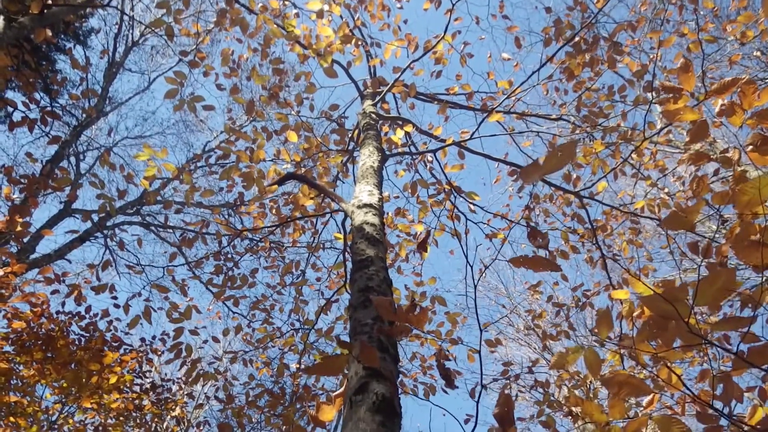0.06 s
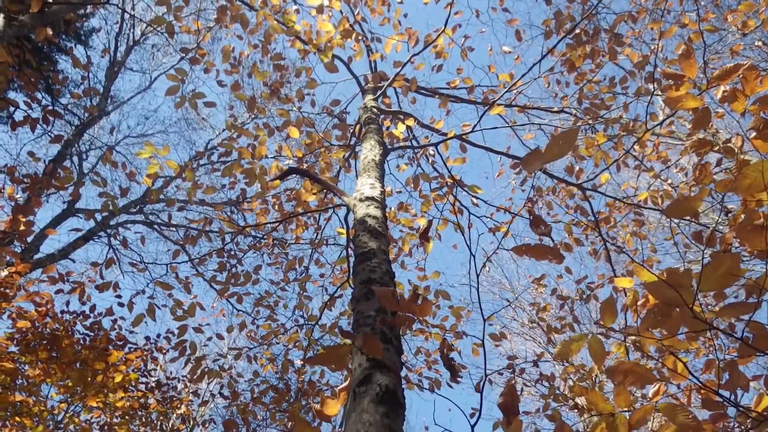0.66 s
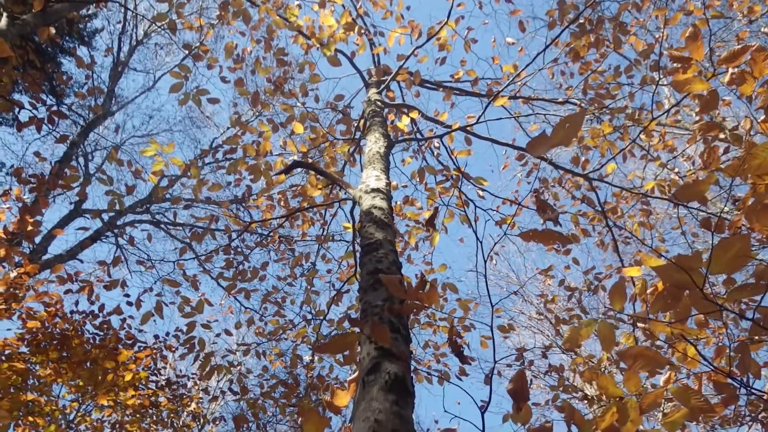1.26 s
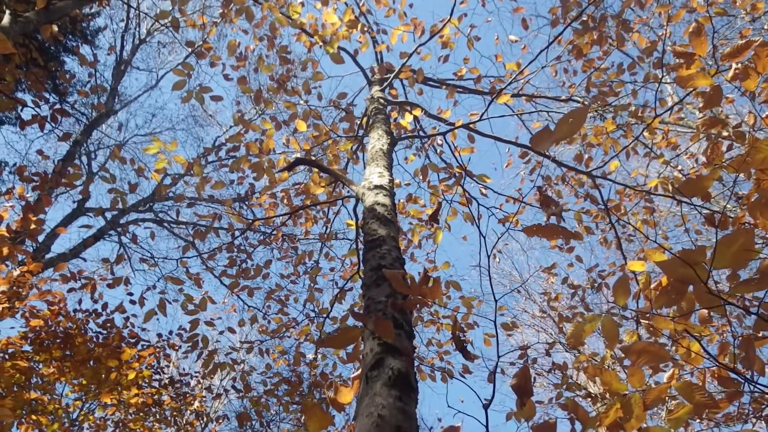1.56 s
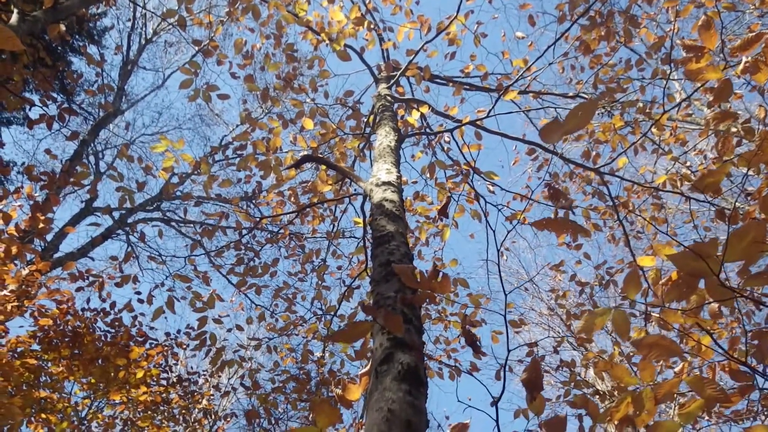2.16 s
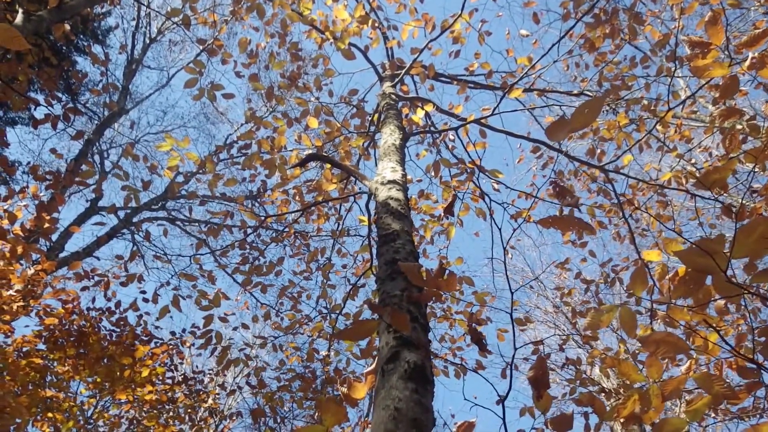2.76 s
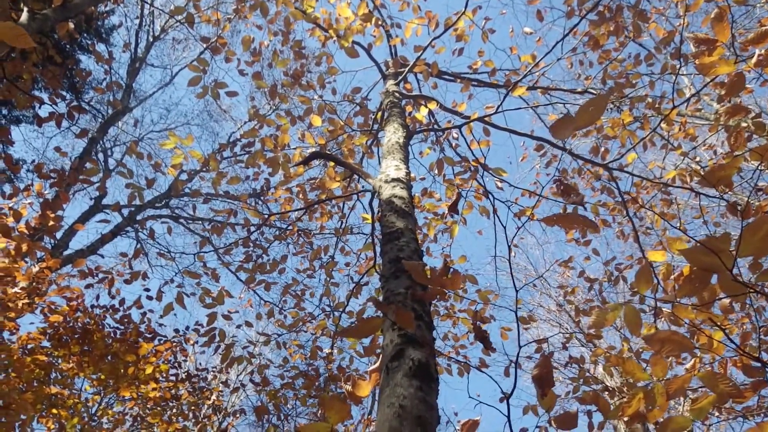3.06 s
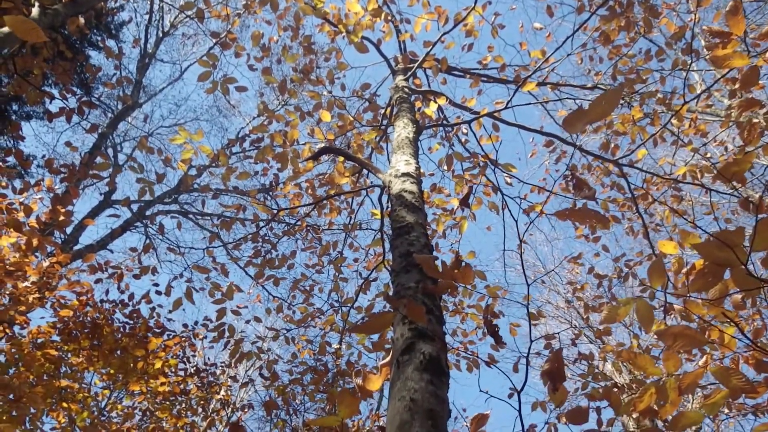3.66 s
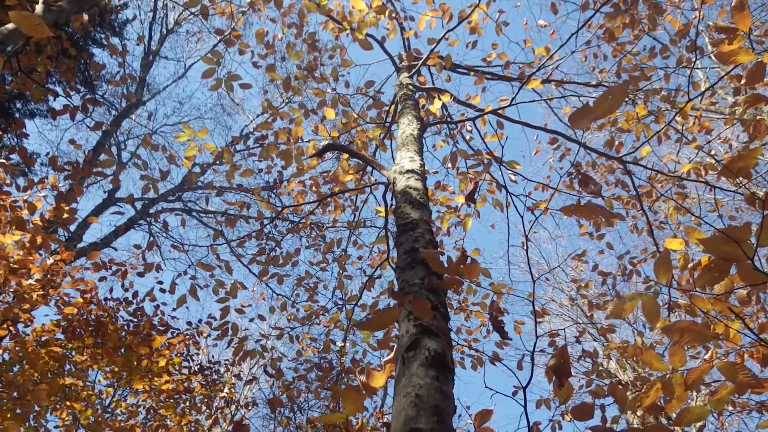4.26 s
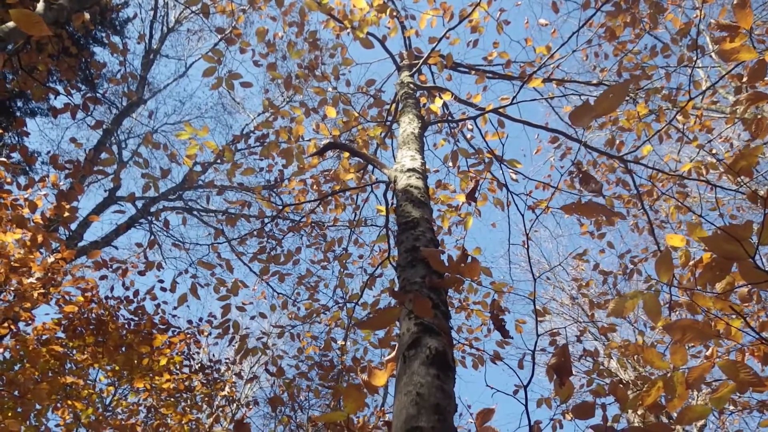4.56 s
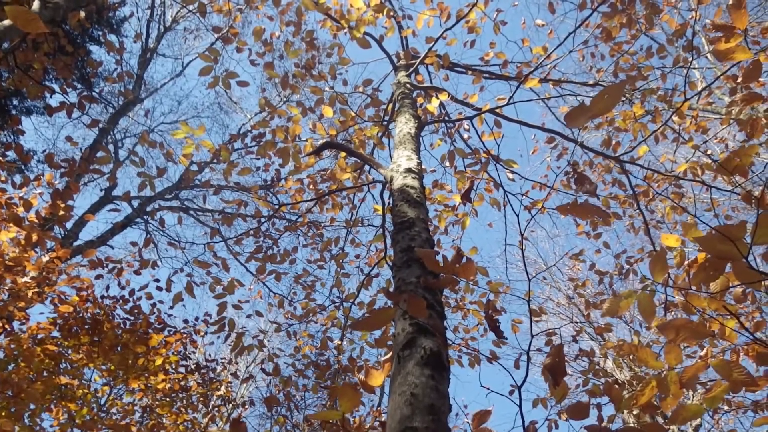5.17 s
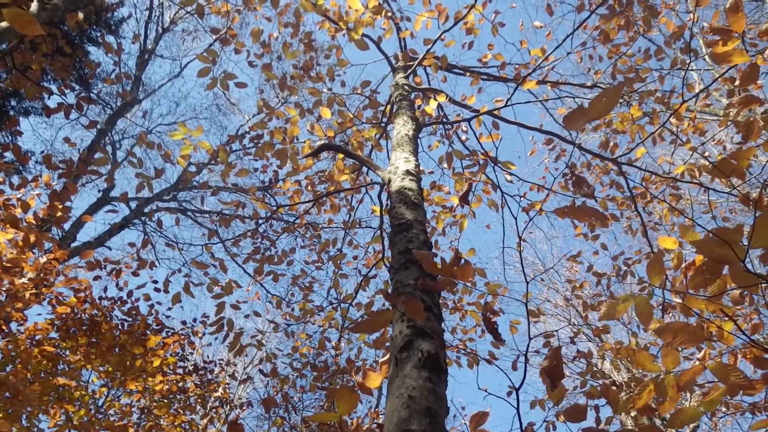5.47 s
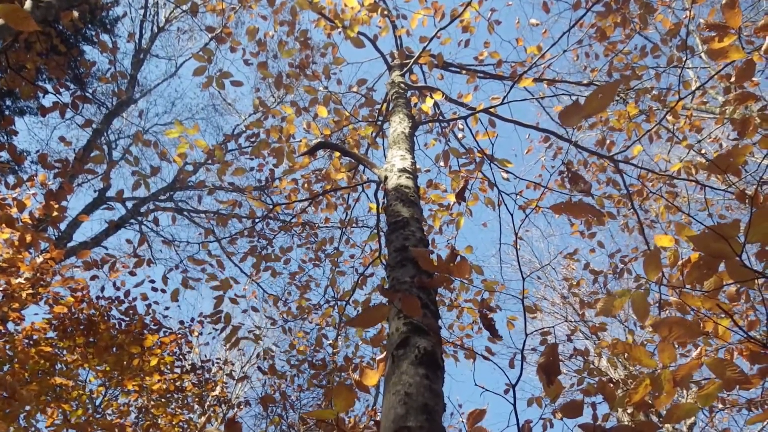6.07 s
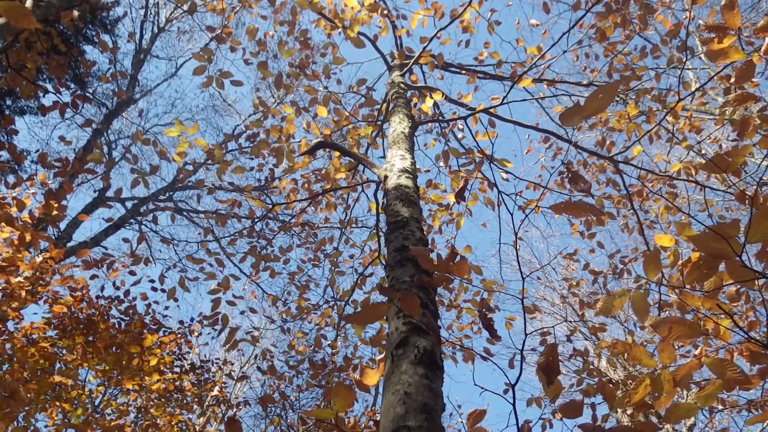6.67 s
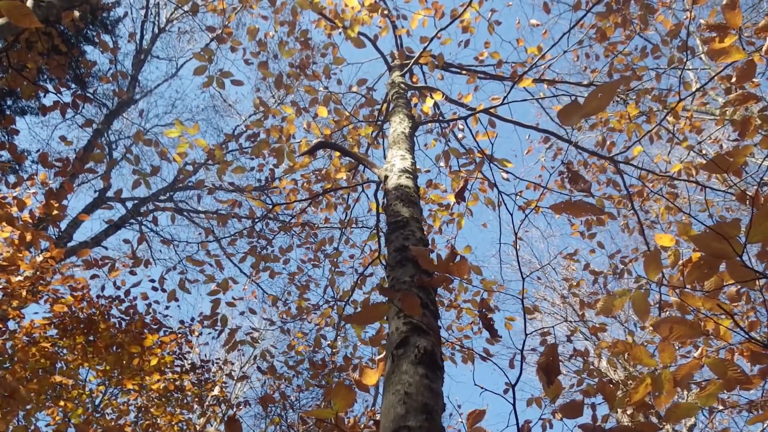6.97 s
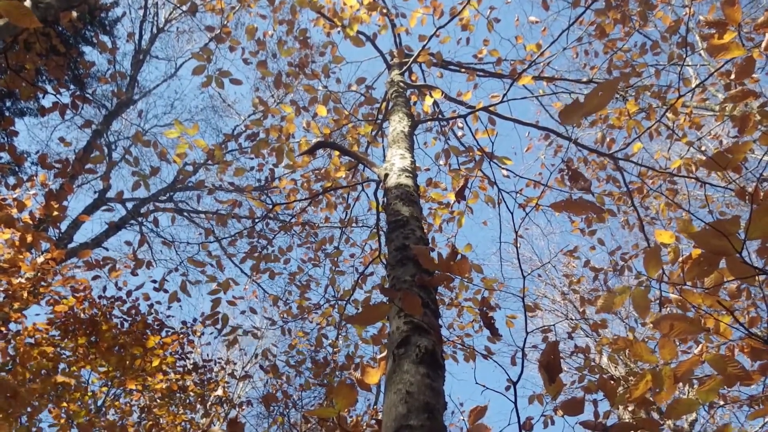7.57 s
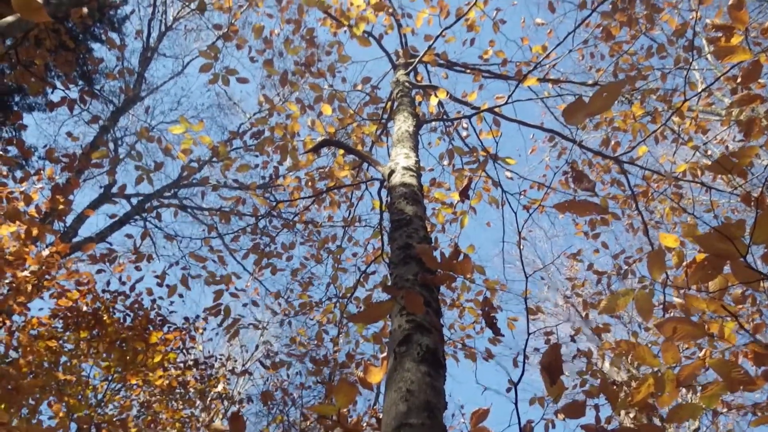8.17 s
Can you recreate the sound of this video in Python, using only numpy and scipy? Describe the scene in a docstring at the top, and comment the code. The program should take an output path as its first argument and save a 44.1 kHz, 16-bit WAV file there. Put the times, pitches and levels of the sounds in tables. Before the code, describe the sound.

Small birds sing thin, high runs and hoarse repeated notes over a soft woodland hiss, with a sharp click of handling near the end.

```python
"""An autumn wood in still air, a camera microphone held below the crowns where chickadees call.
Runs of thin arched notes are each followed by hoarse ones, sung with both sides of the syrinx at once;
there is one lone whistle, and another bird's faint high warble. Twigs, trunks and far trees echo them
over distant air and microphone hiss, with narrow gaps cut by the camera's filters and audio coder.
Near the end the camera body clicks under a finger and is rubbed and nudged a few times."""
import sys
import numpy as np
from scipy import signal
from scipy.fft import rfft, irfft, next_fast_len
from scipy.io import wavfile

SR = 44100
rng = np.random.default_rng(int(sys.argv[2]) if len(sys.argv) > 2 else 0)


def master_out(mix):
    """Clip the mix to full scale and print it as 16-bit PCM to the path in sys.argv[1]."""
    frames = np.transpose(np.atleast_2d(mix))
    ceiling = np.clip(frames, -1, 1)
    pcm = np.round(ceiling * 32767).astype(np.int16)
    wavfile.write(sys.argv[1], SR, pcm)


N = 370881


def undb(db):
    """Decibels to gain."""
    return 10 ** (np.asarray(db) / 20)


def unit(x):
    """Scale to rms 1."""
    return x / np.sqrt(np.mean(x ** 2))


def clock(length):
    """Sample times over a length in seconds."""
    return np.arange(int(length * SR)) / SR


def colour(x, points):
    """Filter by a spectrum of (f/Hz, gain/dB) points, joined on a log frequency axis."""
    size = next_fast_len(len(x))
    hz, db = np.transpose(points)
    gain = undb(np.interp(np.log(np.fft.rfftfreq(size, 1 / SR) + 1), np.log(hz), db))
    return irfft(rfft(x, size) * gain, size)[:len(x)]


def wander(t, rate):
    """Random drift with a spread near 1 that turns rate times a second."""
    points = rng.standard_normal(int(t[-1] * rate) + 2)
    return np.interp(t * rate, np.arange(len(points)), points) * np.sqrt(3 / 2)


def phase(hz):
    """Running phase of a moving pitch."""
    return 2 * np.pi * np.cumsum(hz) / SR


def swell(t, length, rise_s, fall_s):
    """Smooth opening and closing of a note."""
    opening = np.sin(np.pi / 2 * np.clip(t / rise_s, 0, 1))
    closing = np.sin(np.pi / 2 * np.clip((length - t) / fall_s, 0, 1))
    return opening * closing


def add(out, s, x, pan_db):
    """Mix a sound in at time s; pan is left minus right."""
    start = int(s * SR)
    x = x[:max(N - start, 0)]
    sides = undb(np.array([[pan_db], [-pan_db]]) / 2)
    out[:, start:start + len(x)] += x * sides / sides.mean()


def air(mid_db=-50.5, stir_db=0.27):
    """Far woodland air stirs gently in the bass under a steady hiss with two narrow gaps."""
    # distant air and hiss, with two deep narrow gaps cut by the camera's filters and audio coder:
    # f/Hz, level/dB
    gapped_spectrum = [(20, 3), (60, -12), (120, -2.5), (230, 0), (500, -4), (1000, -6), (1400, -7),
                       (1900, -7.5), (2500, -1.5), (2900, -2.5), (3160, -27), (3400, -6), (4000, -8),
                       (4200, -33), (4500, -7.5), (5000, -7), (9000, -8), (15000, -6)]
    # stereo width: f/Hz, side minus mid/dB
    air_width = [(60, -2), (110, -6.5), (200, -7), (380, -4.5), (700, -3), (1290, -4.5), (2380, -12),
                 (4400, 0.5), (8120, -1), (15000, 0)]
    t = np.arange(N) / SR
    mid, side = (unit(colour(rng.standard_normal(N), gapped_spectrum)) for _ in range(2))
    side = colour(side, air_width)
    stereo = np.array([mid + side, mid - side])
    bass = signal.sosfilt(signal.butter(1, 900, fs=SR, output="sos"), stereo)
    stir = undb(-stir_db * wander(t, 4)) - 1
    return undb(mid_db) * (stereo + bass * stir)


def grip():
    """The hand rubs unevenly on the camera body, close to the microphone."""
    # the hand shifting: t/s, level/dB
    hand_moves = [(7.75, -76), (7.85, -58), (8.0, -72), (8.2, -60.5), (8.41, -63)]
    # its dull rubbing: f/Hz, level/dB
    rub_spectrum = [(30, -12), (100, 2.5), (170, 5), (250, -11), (340, -4), (520, -7), (1000, -24),
                    (3000, -45)]
    t, out = np.arange(N) / SR, np.zeros((2, N))
    db = np.interp(t, *np.transpose(hand_moves), left=-120) + 3 * wander(t, 20)
    rub = unit(colour(rng.standard_normal(N), rub_spectrum))
    add(out, 0, rub * undb(db), pan_db=-6)
    return out


def camera_knocks(attack_s=0.00049):
    """Hard contacts ring the shell's short high modes; the push behind them rings the low ones."""
    # finger on the camera body: t/s, click level/dB, thud level/dB
    knocks = [(7.7979, -16, -52), (7.8230, -22, -37), (7.8268, -5, -74), (7.8291, -8.5, -26.5),
              (8.066, -60, -53), (8.226, -63, -50), (8.283, -60, -49), (8.364, -67, -40.5)]
    # modes of the shell: f/Hz, level/dB, t60/s
    shell_modes = [(335.6, 1, 0.12), (393, -9, 0.035), (104, -14.5, 0.19), (193, -17.5, 0.095),
                   (495, -10.5, 0.036), (771, -9.5, 0.069), (1190, -29, 0.024), (1880, -31, 0.0073),
                   (2486, -1.5, 0.022), (2740, 2.5, 0.01), (3600, -1.5, 0.0063), (4350, -8, 0.0058),
                   (6640, -9.5, 0.0036), (8200, -11.5, .003)]
    out, t = np.zeros((2, N)), clock(0.18)
    attack = 1 - np.exp(-t / attack_s)
    for s, click_db, thud_db in knocks:
        for hz, db, t60 in shell_modes:
            blow_db, pan_db = (thud_db, -10) if hz < 1000 else (click_db, 0)
            ring = np.sin(2 * np.pi * hz * t) * undb(blow_db + db - 60 * t / t60)
            add(out, s, ring * attack, pan_db)
    return out


def wood(x, far_db, trunks=(), near_db=-10, near_t60=0.19, far_t60=0.33):
    """Twigs scatter the sound at once, trunks throw back single echoes, far trees leave a thin tail."""
    t = clock(.7)
    out = []
    for channel in x:
        near, far = rng.standard_normal((2, len(t))) * (t > .001)
        near = undb(near_db) * unit(near * undb(-60 * t / near_t60))
        far = undb(far_db) * unit(far * undb(-60 * t / far_t60) * (1 - np.exp(-t / 0.013)))
        echoes = (near + far) / np.sqrt(len(t))
        for delay_s, db in trunks:
            echoes[int(delay_s * SR) + rng.integers(4)] += undb(db)
        out.append(channel + signal.fftconvolve(channel, echoes)[:N])
    return np.array(out)


def microphone_ports(x):
    """The camera body shades and delays one port against the other."""
    # sound arriving from above: f/Hz, left lead/rad, left minus right/dB
    arrival = [(1500, .1, 0), (2700, .4, -1.5), (3500, -1.2, 4.5), (4000, -1.3, 3), (6000, -.2, 0),
               (7300, -.3, 0), (8200, -1.2, -1)]
    hz, lead, balance_db = np.transpose(arrival)
    size = next_fast_len(N)
    f = np.fft.rfftfreq(size, 1 / SR)
    left = np.exp(1j * np.interp(f, hz, lead) / 2) * undb(np.interp(f, hz, balance_db) / 2)
    return irfft(rfft(x, size) * np.array([left, 1 / left]), size)[:, :N]


def warble(length, pitch_hz, leap_hz=1100, rate_hz=39.3):
    """Another bird's thin whistle leaps up and back some forty times a second, softer on each leap."""
    t = clock(length)
    cycle = phase(rate_hz * (1 + 0.023 * wander(t, 33)))
    leap = np.sin(cycle / 2) ** 6
    hz = pitch_hz + leap_hz * leap + 60 * wander(t, 557)
    db = -8 * leap + 2 * wander(t, 59)
    return unit(np.sin(phase(hz)) * undb(db) * swell(t, length, 0.013, 0.03))


def whistle(length=.095, top_hz=8395, crest_db=-38.5, crest_s=0.018, droop_hz=380, fade_db_per_s=115):
    """A single pure note that crests early, then droops and fades."""
    t = clock(length)
    droop = ((t - crest_s) / (length - crest_s)) ** 2
    hz = top_hz - droop_hz * droop + 25 * wander(t, 540)
    db = crest_db - fade_db_per_s * np.abs(t - crest_s)
    return np.sqrt(2) * np.sin(phase(hz)) * undb(db) * swell(t, length, 0.013, .018)


def arched_note(length, top_hz, flick_db, drop, second_db, climb_s=.0135, flick_s=.010):
    """A near sine that climbs, levels off and flicks down, fading as the syrinx lets go."""
    t = clock(length + flick_s)
    progress = np.clip(t / length, 0, 1)
    flick = np.clip((t - length) / flick_s, 0, 1)
    climb_hz = 1160 + 0.566 * (8020 - top_hz)  # lower notes climb further
    hz = (top_hz - climb_hz * np.exp(-t / climb_s)) * (1 - drop * flick)
    hz *= 1 + 0.0072 * wander(t, 933)
    release_db = flick_db * np.clip((t - length + .004) / .007, 0, 1) - 9 * flick
    effort_db = -2 * progress ** 2 + release_db + 1.86 * wander(t, 133)
    # the other side of the syrinx may sound along, a little higher
    second_hz = 1.133 * top_hz * (1 - 0.087 * (1 - progress) ** 2 + 0.006 * wander(t, 887))
    voices = np.sin(phase(hz)) + undb(second_db) * np.sin(phase(second_hz)) * (1 - flick)
    return np.sqrt(2) * voices * undb(effort_db) * swell(t, length + flick_s, 0.016, flick_s / 2)


def thin_calls(second_fade_db_per_s=22):
    """The high voices overhead: runs of arched notes, faint warbles and the lone whistle."""
    # arched notes: t/s, length/s, top f/Hz, level/dB
    notes = [ (1.017, 0.073, 7980, -36), (1.13, 0.038, 7730, -31.5), (1.238, 0.048, 7660, -30.5),
             (1.323, 0.041, 7460, -31.5), (1.428, 0.062, 7580, -29.5), (1.517, 0.04, 7460, -30),
             (1.625, 0.057, 7350, -29), (1.713, .037, 7230, -30.5), (4.695, 0.062, 8220, -37),
             (4.813, 0.043, 7880, -33), (6.532, .078, 8360, -34.3), (6.656, 0.068, 8260, -31),
             (6.79, 0.067, 8180, -37), (6.919, 0.071, 8130, -40), (7.065, 0.092, 8110, -41),
             (7.218, 0.06, 7960, -39)]
    # how each run is sung: t/s, closing flick/dB, its drop/share of pitch, second voice/dB, pan/dB
    runs = [(1.0, -7.5, .48, -11.5, -4.5), (4.6, 1.5, 0.36, -40, -3), (6.5, -3, .39, -40, -5.5)]
    # the other bird's warbles: t/s, length/s, f/Hz, level/dB, pan/dB
    warbles = [(2.036, 0.18, 8000, -56, -1), (3.189, 0.17, 7900, -53.5, -1), (5.434, 0.18, 8000, -54.5, 0),
               (5.835, 0.19, 8000, -55.5, 1), (7.873, 0.19, 7880, -51, -4)]
    out = np.zeros((2, N))
    for s, length, top_hz, db in notes:
        run_s, flick_db, drop, second_db, pan_db = min(runs, key=lambda run: abs(run[0] - s))
        second_db -= second_fade_db_per_s * (s - run_s)
        add(out, s, undb(db) * arched_note(length, top_hz, flick_db, drop, second_db), pan_db)
    for s, length, pitch_hz, db, pan_db in warbles:
        add(out, s, undb(db) * warble(length, pitch_hz), pan_db)
    add(out, 3.371, whistle(), pan_db=-10)
    return out


def hoarse_note(length, lower_hz, upper_hz, rough, narrow_db, jitter=0.014):
    """Both sides of the syrinx sound: a rasp scoops up, settles into mixed tones, sags and frays."""
    # tones of the two coupled voices: multiple of the lower, multiple of the upper
    mixtures = [(1, 0), (0, 1), (-1, 2), (-2, 3), (-3, 4), (1, 1), (0, 2), (-1, 3), (3, 0), (2, 1), (1, 2),
                (0, 3)]
    # strength of each tone: level/dB
    mixture_db = [3, 6, -1, .5, -6, 0, -1, -8, -3.5, -9, -4.5, -14]
    # resonances of the bird's throat: f/Hz, gain/dB
    throat = [(1000, -20.5), (1500, -16.5), (1900, -13.5), (2350, -7), (2760, 6), (3050, 0), (3500, 3),
              (3800, 2), (4200, 3.5), (5000, -9.5), (5400, -3.5), (6000, -9.5), (10000, -20.5)]
    t = clock(length)
    edges = (2 * t / length - 1) ** 2  # 1 at either end, 0 mid-note
    ragged = rough + 0.72 * edges ** 2
    scoop = .16 * np.exp(-t / .031)
    sag = 0.0408 * (t / length) ** 4
    tension = 1 - scoop - sag + .005 * wander(t, 35) + jitter * ragged * wander(t, 503.7)
    lower = phase(lower_hz * (tension + 0.0055 * ragged * wander(t, 412)))
    upper = phase(upper_hz * (tension + 0.0055 * ragged * wander(t, 412)))
    tones = np.zeros(len(t))
    for (a, b), db in zip(mixtures, mixture_db):
        strength = undb(db + 2.5 * wander(t, 12.6))  # the coupling shifts, so each tone swells alone
        tones += strength * np.sin(a * lower + b * upper + rng.uniform(0, 2 * np.pi))
    # air rasps through once per beat of the two voices
    rasp = rng.standard_normal(len(t)) * (1 + np.cos(upper - lower))
    source = unit(tones) * swell(t, length, 0.034, 0.035) + 1.262 * ragged * rasp
    # a narrowed throat favours its main resonance
    narrowing = [(2900, -narrow_db), (3580, 0), (4300, -narrow_db)]
    voice = colour(colour(source, throat), narrowing)
    edge_db = (3 - narrow_db / 2) * edges
    return unit(voice * swell(t, length, 0.022, 0.02) * undb(edge_db))


def hoarse_calls(sung_share=.875, pitch_scatter=0.00398):
    """Each series repeats one note at a steady pace, growing or fading, until the bird breaks off."""
    # series of hoarse notes: start t/s, end t/s, period/s, lower f/Hz, upper f/Hz, level/dB,
    # crescendo/(dB/s), roughness/0-1, roughness gained/(1/s), throat narrowing/dB
    series = [ (1.817, 2.41, .204, 1529, 1913, -41, 3, 0.3, 0.18, 4.5),
              (2.294, 3.315, .2205, 1590, 1930, -45.7, -.2, .7, -.3, 3.5),
              (5.063, 5.845, .2, 1623, 1970, -45, -0.6, 0.43, 1.23, 12),
              (6.798, 7.43, .214, 1589, 1951, -44.5, 11, 0.72, 0.44, 7.5),
              (7.445, 8.5, .215, 1555, 1932, -37.5, 2, 0.64, -0.027, 6)]
    out = np.zeros((2, N))
    for start, end, period, lower_hz, upper_hz, db, crescendo, first_rough, fraying, narrow_db in series:
        for s in np.arange(start, end - period / 2, period):
            length = min(sung_share * period, end - s)
            tension = 1 + pitch_scatter * rng.standard_normal()
            rough = np.clip(first_rough + fraying * (s - start), 0, 1)
            note = hoarse_note(length, tension * lower_hz, tension * upper_hz, rough, narrow_db)
            add(out, s, undb(db + crescendo * (s - start)) * note, pan_db=0)
    return out


def birds():
    """The calls carry down from the crowns to the microphone, each kind with its own share of echo."""
    # trunks that echo the thin calls: delay/s, level/dB
    trunks = [(.0052, -16), (.0125, -18), (.031, -17)]
    thin = wood(thin_calls(), far_db=-9, trunks=trunks)
    hoarse = wood(hoarse_calls(), far_db=-10)
    return microphone_ports(thin + hoarse)


def scene():
    """Birds overhead, the camera in the hand, the air around."""
    return birds() + camera_knocks() + grip() + air()


def record(dry, rumble_hz=52, top_hz=15750):
    """The camera notches out a few narrow bands and cuts the rumble and the top."""
    # bands the camera filters out: f/Hz, width/Hz
    notches = [(1600, 310), (2080, 230), (3160, 432), (4200, 334)]
    for hz, width_hz in notches:
        b, a = signal.iirnotch(hz, hz / width_hz, fs=SR)
        dry = signal.lfilter(b, a, dry)
        if width_hz > 400:  # the widest notch is doubled, so deep and flat
            dry = signal.lfilter(b, a, dry)
    dry = signal.sosfilt(signal.butter(2, rumble_hz, "high", fs=SR, output="sos"), dry)
    return signal.sosfilt(signal.ellip(10, .1, 60, top_hz, fs=SR, output="sos"), dry)


dry = scene()
out = record(dry)
master_out(out)
```